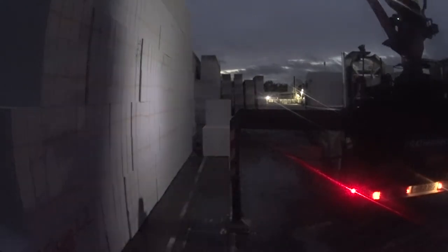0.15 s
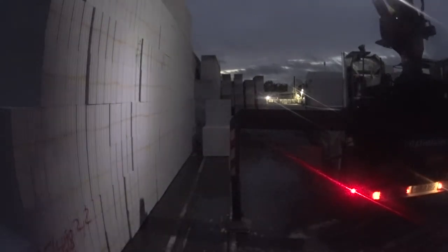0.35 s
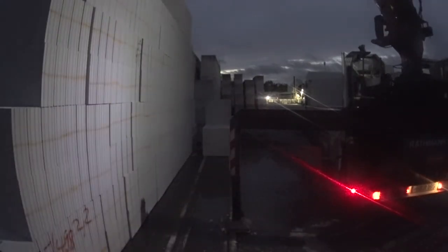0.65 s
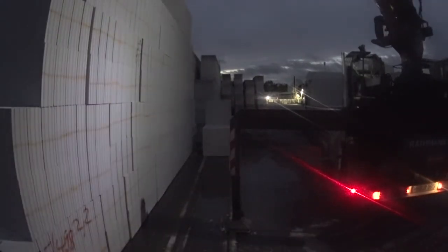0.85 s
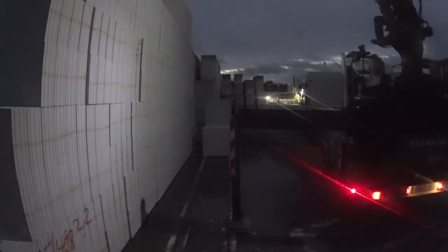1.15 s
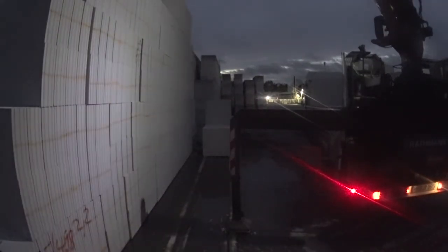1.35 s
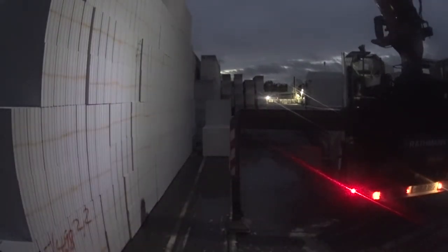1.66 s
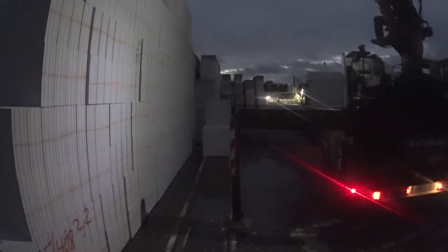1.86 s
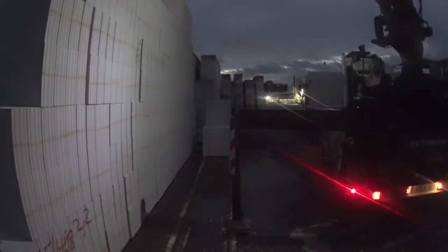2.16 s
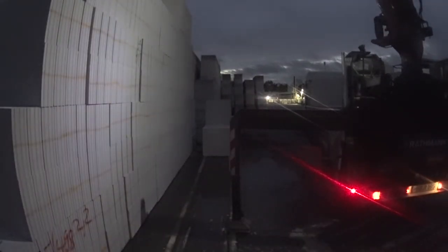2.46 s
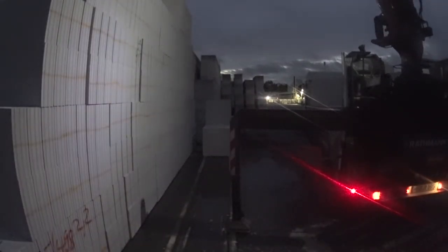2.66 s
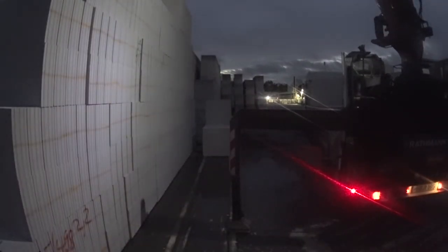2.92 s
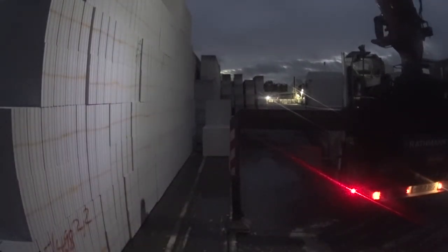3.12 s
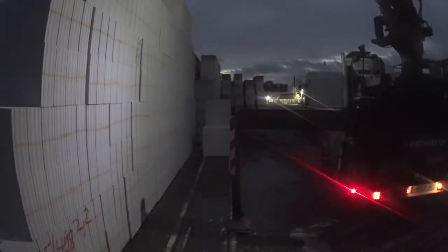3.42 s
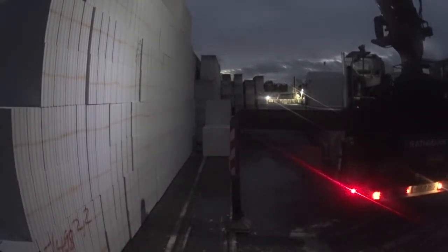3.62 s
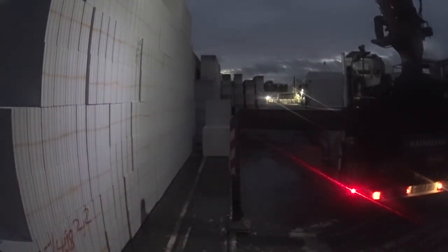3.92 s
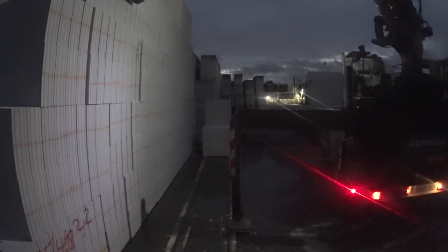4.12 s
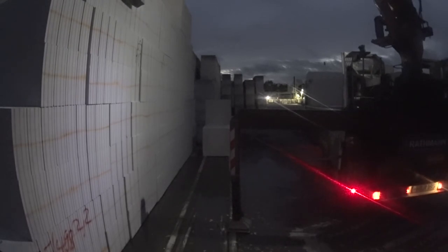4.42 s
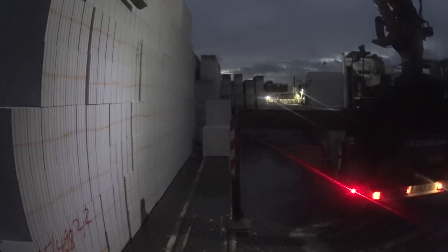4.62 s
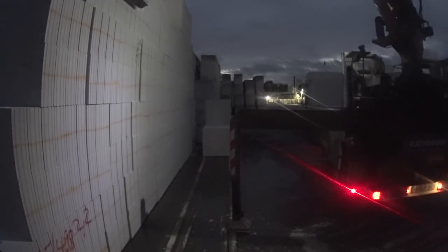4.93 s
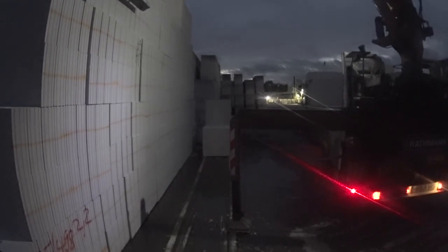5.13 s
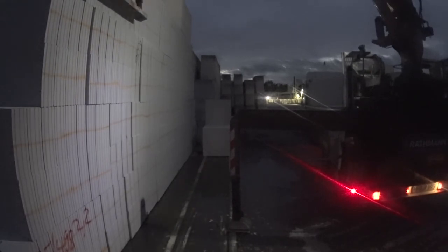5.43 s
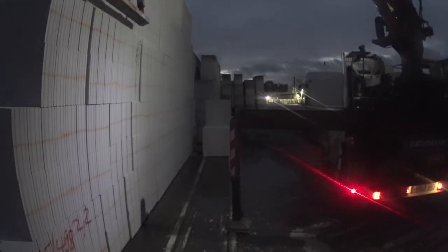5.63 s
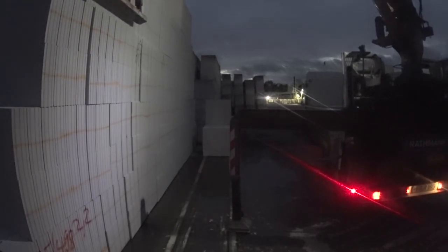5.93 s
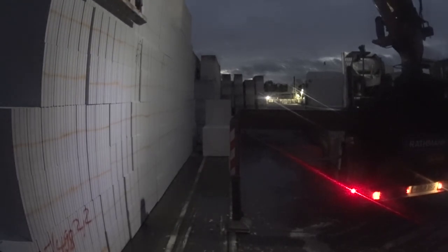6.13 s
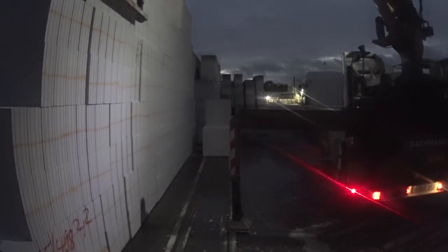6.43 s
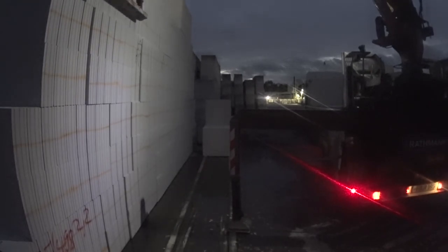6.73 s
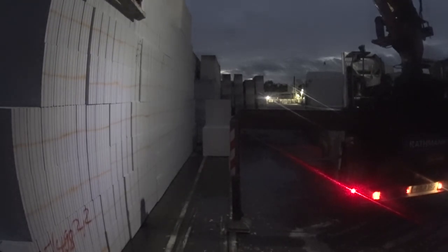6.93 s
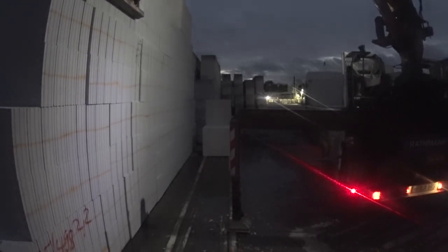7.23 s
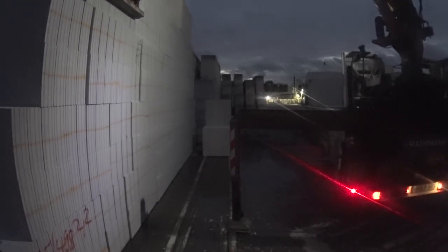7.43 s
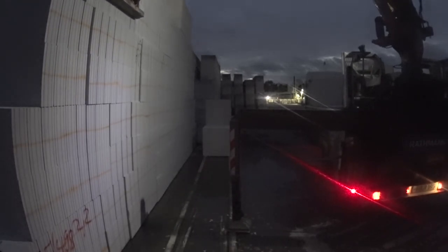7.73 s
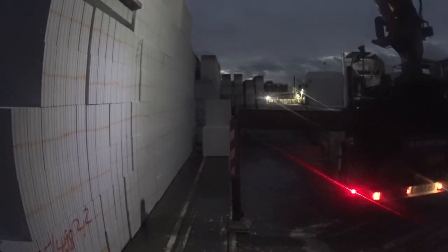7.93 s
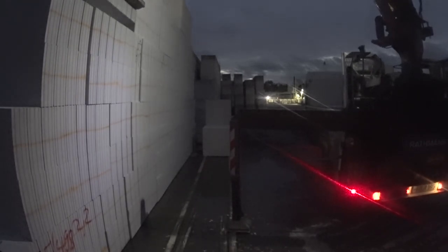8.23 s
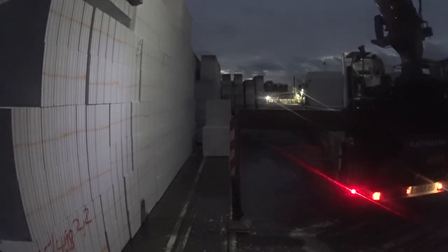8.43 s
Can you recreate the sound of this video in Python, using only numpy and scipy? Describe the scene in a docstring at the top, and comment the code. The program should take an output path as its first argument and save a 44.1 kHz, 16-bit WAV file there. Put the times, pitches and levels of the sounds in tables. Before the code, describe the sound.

Close stereo pickup beside a crane truck in an open yard. First a high valve whistle over the whining gear pump, then metallic ticks and a dry crackling rustle nearby. The whine keeps surging in short pulls, sometimes sagging roughly in pitch and springing back. Scattered clinks, soft scuffs and dull knocks follow, mostly quiet, with the strongest knock near the end.

```python
"""A loader crane's gear pump whines in a yard, as harmonics of the rate at which its teeth mesh.
Each load pulls the shaft to a new rate, mostly lower, and raises the whine; motor hum and
filtered-noise oil hiss follow it. Valves whistle at times as shaken tones, and brief tones rise.
Close by, noise bursts make small metal parts jingle and dull things knock, shuffle and rustle grittily."""
import sys
import numpy as np
from scipy import signal
from scipy.io import wavfile
from scipy.ndimage import uniform_filter1d

SR = 44100
rng = np.random.default_rng(int(sys.argv[2]) if len(sys.argv) > 2 else 0)


def wrap_up_sound(samples):
    """Save the sound to the file named by the first command line argument, as 16-bit audio."""
    columns = np.atleast_2d(samples).T
    # keep every value between -1 and 1, then stretch to whole-number steps
    tamed = np.clip(columns, -1, 1)
    steps = np.round(tamed * 32767).astype(np.int16)
    wavfile.write(sys.argv[1], SR, steps)


N = 377937
OPPOSED = np.array([[1], [-1]])   # side sound: opposite phase at the left and right microphone


def from_db(db):
    """Decibels to gain."""
    return 10 ** (np.asarray(db) / 20)


def rms_one(x):
    """Scale to rms 1."""
    return x / np.sqrt(np.mean(x ** 2) + 1e-20)


def in_time(rows):
    """Columns of a curve at every sample."""
    s, *columns = np.transpose(rows)
    return [np.interp(np.arange(N) / SR, s, column) for column in columns]


def sounding(rows):
    """1 within the span of a curve, with a short fade at each end."""
    start, end = rows[0][0], rows[-1][0]
    return np.interp(np.arange(N) / SR, [start - .02, start, end, end + .016], [0, 1, 1, 0])


def at_hz(points, hz):
    """Read a spectrum on a log frequency axis."""
    points_hz, level_db = np.array(points).T
    return np.interp(np.log(hz), np.log(points_hz), level_db)


def bandpass(x, order, low_hz, high_hz):
    """Keep one band of a sound."""
    return signal.sosfilt(signal.butter(order, [low_hz, high_hz], "band", fs=SR, output="sos"), x)


def panned(x, pan_db):
    """Lean towards the left microphone by a level step."""
    return x * from_db([[pan_db / 2], [-pan_db / 2]])


def drift(rate_hz):
    """Random wander of spread about 1: noise through two equal poles, drawn every 40 samples."""
    r = np.exp(-80 * np.pi * rate_hz / SR)
    noise = rng.standard_normal(N // 40 + 2002)
    slow = signal.lfilter([1], [1, -2 * r, r * r], noise)[2000:]   # skip the filter's start
    return np.interp(np.arange(N) / 40, np.arange(len(slow)), rms_one(slow))


def bank(sources, spectrum, width, patchy_db):
    """Half-octave bands of two mid-side noise pairs, each with its own level, flicker and width; rms 1."""
    out = 0
    edges_hz = 22 * 2 ** np.arange(0, 10, .5)
    together = drift(2.2)   # shared flicker, strongest in the bass
    for k, (low_hz, high_hz) in enumerate(zip(edges_hz, edges_hz[1:])):
        mid, side = bandpass(sources[k % 2], 2, low_hz, high_hz)
        hz = np.sqrt(low_hz * high_hz)
        flicker = drift(8.3) + 220 / (hz + 50) * together
        gain = from_db(at_hz(spectrum, hz) + patchy_db * flicker)
        out = out + gain * (mid + from_db(at_hz(width, hz)) * side * OPPOSED)
    return rms_one(out)


def tone(phase, multiple, level_db, waver_db, spread):
    """A partial whose level wavers and whose phase (spread in radians) differs between the microphones."""
    lag = spread * drift(4.2) * OPPOSED / 2
    start = rng.uniform(0, 2 * np.pi)
    return np.sqrt(2) * from_db(level_db + waver_db * drift(8.4)) * np.sin(multiple * phase + start + lag)


def burst(start_s, length_s, t60, low_hz, high_hz, grit_db):
    """Gritty noise that swells, holds, then dies; returns its start sample and a mid-side pair."""
    t = np.arange(int(.15 * SR)) / SR
    draw = rng.standard_normal((3, len(t)))
    shape = from_db(-60 * np.maximum(t - length_s, 0) / t60) * np.minimum(t / .0015, 1)
    grit = from_db(grit_db * rms_one(uniform_filter1d(draw[2], size=25)))
    return round(start_s * SR), bandpass(draw[:2] * shape * grit, 2, low_hz, high_hz)


def add(out, at, sound):
    """Mix a short sound in at a sample."""
    out[..., at:at + sound.shape[-1]] += sound[..., :out.shape[-1] - at]


# Partials of the motor hum. Each row: multiple of the hum rate, level in dB before the load acts.
HUM_PARTIALS = [(1, -61.5), (2, -71.5), (3, -77)]
HUM_PER_TOOTH = .3545   # hum rate over tooth rate


def motor_hum(phase, load_db):
    """Low partials locked to the shaft; load lifts the upper ones most."""
    return sum(tone(HUM_PER_TOOTH * phase, k, db + (0.12 + 0.22 * k) * load_db, waver_db=1.34, spread=0.032)
               for k, db in HUM_PARTIALS)


# Colour of the oil hiss. Each row: frequency in Hz, relative level in dB per Hz.
HISS_COLOUR = [(20, -25), (191, -25.5), (246, -14), (298, -20.5), (910, -14), (1380, -16), (1500, -6),
               (2770, -2), (6400, 0.5), (15600, -7)]
# Side level given to the hiss: nearly mono in the middle, wider on top.
# Each row: frequency in Hz, side against mid in dB.
HISS_SIDE = [(60, -20), (150, -17), (380, -31), (950, -28), (3000, -47), (4600, -10), (15000, -7)]
# Course of the oil flow. Each row: time in seconds, relative level of the hiss in dB.
OIL_FLOW = [(0.0, -35.5), (0.67, -37.5), (2.4, -38.5), (7.25, -39), (8.3, -38)]


def oil_hiss(load_db, labour):
    """Oil rushing through the valves as banded noise: louder under load, flickering fast in a slow pump."""
    noise = rng.standard_normal((2, 2, N)) * from_db(2.0 * labour * drift(270.0))
    level_db = in_time(OIL_FLOW)[0] + 1.5 + 0.22 * load_db + 2.0 * labour
    return from_db(level_db) * bank(noise, HISS_COLOUR, HISS_SIDE, patchy_db=1.38)


# Faint gritty shuffles close by. Each row: start in seconds, relative level in dB, length in seconds.
SHUFFLE_EVENTS = [(2.66, -51.5, 0.2), (3.173, -47, 0.58), (3.854, -49, 0.45), (5.297, -46.5, 0.52),
                  (6.351, -54, 0.24), (7.18, -42, 0.21), (7.948, -43.5, 0.75)]


def shuffles():
    """Dull grit under a smooth swell, wide between the microphones."""
    t = np.arange(N) / SR
    shape = sum(np.sin(np.pi * np.clip((t - s) / length_s, 0, 1)) * from_db(db)
                for s, db, length_s in SHUFFLE_EVENTS)
    noise = rng.standard_normal((2, N)) * shape * from_db(4.7 * drift(28.0))
    mid, side = bandpass(noise, 3, 700, 3200)
    return mid + 1.93 * side * OPPOSED


# Stroke of the rustle close by. Each row: time in seconds, relative level in dB.
RUSTLE_STROKE = [(1.62, -50.5), (1.72, -38), (1.9, -37.5), (2.08, -39.5), (2.12, -32), (2.27, -38),
                 (2.35, -34), (2.421, -38), (2.5, -32.5), (2.559, -48)]
# Crackling swells in the rustle. Each row: start in seconds, relative level in dB, length in seconds.
CRACKLES = [(1.806, -43, 0.00059), (1.853, -30, 0.00055), (2.116, -32, 0.023), (2.142, -24.5, 0.01),
            (2.153, -32.5, 0.029), (2.185, -25, 0.0053), (2.19, -28, 0.037), (2.233, -24, 0.016),
            (2.287, -22.5, 0.0061), (2.336, -28, 0.0076), (2.391, -33, 0.0009), (2.407, -50, 0.0005),
            (2.4355, -22, 0.0011), (2.458, -30.5, 0.01), (2.485, -24.5, 0.0016)]
# Colour of the rustle at the microphones. Each row: band centre in Hz, mid gain in dB, side gain in dB.
GRIT_BANDS = [(900, -7, -8), (1600, 5, 9), (2679, 10, 15), (4330, 2.5, 9.5)]


def rustle():
    """Dense short clicks in separately flickering bands, mostly in opposite phase at the microphones."""
    at = round(RUSTLE_STROKE[0][0] * SR)
    t = RUSTLE_STROKE[0][0] + np.arange(SR) / SR
    stroke = sounding(RUSTLE_STROKE) * from_db(in_time(RUSTLE_STROKE)[0] + 2.4 * drift(38.0))
    shape = stroke[at:at + SR]
    for s, level_db, length_s in CRACKLES:
        rise = np.clip((t - s) / (0.0003 + 0.38 * length_s), 0, 1)
        shape += rise * from_db(level_db - 60 * np.maximum(t - s - length_s, 0) / 0.037)
    # about 3500 clicks a second of uneven size, over a weaker steady noise
    strength = from_db(2.28 * np.minimum(rng.exponential(1, SR), 3.0))
    sizes = 0.15 + (rng.random(SR) < 3500 / SR) * strength
    clicks = rms_one(sizes) * rng.standard_normal((2, SR)) * shape
    for s, level_db, _ in CRACKLES:   # each swell opens with one sharp click
        clicks[:, round(s * SR) - at] += from_db(level_db + 9.0)
    out = np.zeros((2, N))
    for hz, mid_db, side_db in GRIT_BANDS:
        mid, side = bandpass(clicks, 2, hz / 1.416, hz * 1.383) * from_db(2.1 * drift(80.0)[:SR])
        out[:, at:at + SR] += from_db(mid_db) * mid + from_db(side_db) * side * OPPOSED
    return out


# Dull knocks close by. Each row: start in seconds, relative peak level in dB, centre in Hz.
KNOCK_EVENTS = [(1.528, -34.5, 1294), (2.801, -35, 1515), (3.257, -40, 1196), (3.331, -39, 1700),
                (4.103, -31, 1798), (5.503, -39, 1403), (5.518, -35, 1197), (5.533, -35, 1502),
                (6.914, -36.5, 1784), (8.275, -35, 1400), (8.295, -29.5, 1397), (8.318, -22, 2297),
                (8.325, -42, 2272)]


def knocks():
    """Short dull crunches of band-limited noise, wide between the microphones."""
    out = np.zeros((2, N))
    for s, peak_db, hz in KNOCK_EVENTS:
        at, (mid, side) = burst(s, 0.0037, 0.076, hz / 1.7, hz * 1.87, grit_db=3.0)
        add(out, at, (mid + 1.85 * side * OPPOSED) * from_db(peak_db + 1) / np.std(mid[:400]) / 2)
    return signal.sosfilt(signal.butter(2, 550, "high", fs=SR, output="sos"), out)


def ring(x, hz, t60):
    """One mode: a unit click sets a decaying sine ringing."""
    r, w = from_db(-60 / (t60 * SR)), 2 * np.pi * hz / SR
    return signal.lfilter([0, np.sin(w)], [1, -2 * r * np.cos(w), r * r], x)


# Jingles of small metal parts close by. Each row: start in seconds, relative peak level in dB,
# length in seconds before the contacts die away.
JINGLES = [(1.117, -9, 0.018), (1.1455, -17, 0.0021), (1.152, -16, 0.0038), (1.203, -12, 0.0018),
           (1.244, -22, .003), (1.5366, -10, 0.024), (1.584, -19.5, 0.006), (1.771, -14, 0.0028),
           (1.8305, -20, 0.0021), (2.099, -23, 0.0035), (2.248, -15, 0.0026), (2.288, -15.5, 0.0022),
           (2.9483, -12.5, 0.0036), (4.0932, -12, 0.0083), (4.12, -17, 0.0021), (4.162, -20.5, 0.00096),
           (4.235, -18.5, 0.0066), (4.7712, -9.5, 0.0073), (5.227, -22.5, 0.003), (6.371, -25.5, 0.0029),
           (6.397, -23.5, 0.0029), (6.453, -15, 0.0088), (7.1747, -19.5, 0.0025), (7.204, -18, 0.0029),
           (7.2122, -15, 0.006), (7.2215, -12.5, 0.003)]
# Modes of the small metal parts. Each row: frequency in Hz, relative level in dB, 60 dB decay in seconds.
METAL_MODES = [(2900, -18, .012), (4170, -19, .007), (7600, -2, .025), (8800, 4, .012), (10090, 6, .06),
               (12800, 8, .018), (15110, 8, .045)]
RING_DB = -41   # the modes against the direct spray, before long sprays lower it


def metal_jingle():
    """Tiny contacts to the left, heard directly and through metal modes whose balance varies each time."""
    out = np.zeros((2, N))
    for s, peak_db, length_s in JINGLES:
        at, (spray, side) = burst(s, length_s, 0.037, 4970, .45 * SR, grit_db=4.0)
        luck_db = rng.normal(0, 4, len(METAL_MODES))
        ringing = sum(from_db(db + luck) * ring(spray, hz, t60)
                      for (hz, db, t60), luck in zip(METAL_MODES, luck_db))
        mid = spray + from_db(RING_DB) / np.sqrt(1 + length_s / 0.044) * ringing
        gain = from_db(peak_db - 3.0) / np.std(mid[:250 + int(length_s * SR)]) / 2
        add(out, at, (mid + 0.28 * side * OPPOSED) * gain)
    return panned(out, 3.1)


# Brief rising tones, some of them upper pump harmonics standing out.
# Each row: start in seconds, mean pitch in Hz, relative level in dB, length in seconds.
RISING_TONES = [(0.638, 3600, -37, 0.037), (3.652, 4824, -34.5, 0.012), (5.412, 3080, -38, 0.009),
                (7.394, 4960, -35.5, 0.019)]


def rising_tones():
    """Brief tones under a smooth swell, their pitch rising a little."""
    out = np.zeros(N)
    for s, hz, level_db, length_s in RISING_TONES:
        t = np.arange(int(length_s * SR)) / SR
        swell = from_db(level_db + 5.5) * np.sin(np.pi * t / length_s)
        cycles = hz * t * (1 + 0.028 * (t / length_s - 1))
        add(out, round(s * SR), swell * np.sin(2 * np.pi * cycles))
    return out


def whistle(rows, width_hz):
    """A tone whose pitch is shaken by the turbulent jet."""
    hz, level_db = in_time(rows)
    phase = 2 * np.pi * np.cumsum(hz + width_hz * drift(163.0)) / SR
    return sounding(rows) * tone(phase, 1, level_db - 6.5, waver_db=3.0, spread=0.41)


# High valve whistles, one curve each. Each row: time in seconds, mean pitch in Hz, relative level in dB.
HIGH_WHISTLES = [
    [(0.0, 10800, -39.5), (0.394, 10580, -32), (0.48, 10800, -51)],
    [(7.38, 10490, -46), (7.532, 10350, -35), (7.56, 10240, -64)],
]
# A lower valve whistle. Each row: time in seconds, mean pitch in Hz, relative level in dB.
LOWER_WHISTLE = [(0.17, 5250, -41), (0.25, 5400, -26.5), (0.44, 5400, -40)]
# Upper strand into which the lower one splits. Each row: time in seconds, mean pitch in Hz,
# relative level in dB.
SPLIT_WHISTLE = [(0.27, 5580, -38), (0.34, 5660, -29), (0.41, 5560, -38)]


def valve_whistles():
    """Oil jets whistle in the valves: high tones, and a lower one that splits in two."""
    high = sum(whistle(rows, width_hz=120) for rows in HIGH_WHISTLES)
    return high + whistle(LOWER_WHISTLE, width_hz=37) + whistle(SPLIT_WHISTLE, width_hz=58)


# Loads on the pump. Each row: onset in seconds, time to the new rate in seconds, hold in seconds,
# tooth rate reached first in Hz, rate at release in Hz, rate just after release in Hz, then in dB the
# relative levels that whine and third harmonic grow towards and the lift of the fifth harmonic.
PUMP_LOADS = [(-0.3, 0.23, 0.68, 693, 704.5, 740, -36.5, -39, 0),
              (0.55, 0.053, 0.056, 709, 714, 764, -33.5, -37.5, 0.5),
              (0.715, 0.054, 0.14, 700, 701, 706, -42, -43.5, 2.5),
              (0.917, 0.084, 0.15, 694, 704, 720, -36.5, -44.5, 4),
              (1.177, 0.26, 0.0849, 701.6, 701, 740, -38.5, -44.5, 5),
              (1.859, 0.06, 0.44, 691.7, 704, 723, -40, -46, 0),
              (2.68, 0.066, 0.45, 697, 706, 710, -43.5, -49, 7.5),
              (3.311, 0.053, 0.22, 689, 702.6, 717, -38.5, -44, 4),
              (3.625, 0.048, 0.056, 638, 651, 753, -34, -36.5, 0),
              (3.886, 0.035, .21, 691, 703, 722, -38.5, -45, 1.5),
              (4.257, 0.068, 0.18, 678.6, 690, 710, -38.5, -43, 2.5),
              (4.483, 0.047, 0.021, 711.4, 722, 727, -32.5, -40, 9),
              (4.549, 0.062, 0.0087, 669, 669, 765, -31.5, -40, -2.5),
              (4.722, 0.036, 0.02, 687, 695, 718, -36.5, -44, 3),
              (5.022, 0.046, 0.087, 687.4, 698.6, 709, -41, -43.5, 1.5),
              (5.291, 0.047, 0.15, 687, 698.3, 726, -40.5, -45.5, 2.5),
              (5.612, 0.044, 0.16, 686.7, 701, 718.6, -39, -45, 4),
              (5.975, 0.0554, 0.047, 687, 687, 695, -40, -44.5, 3),
              (6.07, 0.076, 0.056, 675, 684, 743, -36.5, -44, 3),
              (6.311, 0.062, 0.1, 693.4, 700.8, 721, -38, -46.5, 5),
              (6.62, 0.063, 0.19, 687.4, 683, 729, -40, -46, 1),
              (7.128, 0.064, 0.081, 638.5, 665.4, 764, -34.5, -39, 2),
              (7.366, 0.061, .13, 654.3, 696, 779, -32, -41, 1),
              (7.676, 0.23, 0.017, 676, 689, 695, -37, -46.5, 1.5),
              (7.904, 0.086, 0.37, 699.4, 705.4, 713, -35.5, -36.5, -1.5),
              (8.376, 0.047, 0.28, 714, 710, 718, -37.5, -43.5, 1)]
IDLE_HZ, IDLE_WHINE_DB, IDLE_THIRD_DB = 707.7, -53, -53.5   # tooth rate and relative levels without load
RECOVER_S, SETTLE_S = 0.15, 0.07   # the rate moves on under load; settles to idle after the release
RELEASE_S, FADE_S = 0.0311, 0.032   # the load lets go; the whine dies away after it
SWELL_DB, SWELL_S = 4.5, 0.13   # the whine still grows while the load is on
PULL_CURVE, GRIP_S = 0.7, 0.038   # under 1 the pull is fastest at first; time for the whine to come up


def shaft():
    """Each load pulls the shaft to a new rate, mostly lower; release shifts it again, then it settles to idle.

    Returns tooth rate, whine level, third harmonic level and fifth harmonic lift."""
    idle = np.array([[IDLE_HZ], [IDLE_WHINE_DB], [IDLE_THIRD_DB], [0]], float)
    state = idle * np.ones(N)
    for on, pull_s, hold_s, first_hz, end_hz, after_hz, whine_db, third_db, fifth_db in PUMP_LOADS:
        i = max(round(on * SR), 0)
        t = np.maximum(np.arange(i, min(i + SR, N)) / SR - on, 0)
        moved = 1 - np.exp(-np.clip(t - pull_s, 0, hold_s) / RECOVER_S)
        moved /= 1 - np.exp(-hold_s / RECOVER_S)
        short_db = SWELL_DB * np.exp(-t / SWELL_S)
        held_hz = first_hz + (end_hz - first_hz) * moved
        held = np.array([held_hz, whine_db - short_db, third_db - short_db, fifth_db + 0 * t])
        after = t - pull_s - hold_s
        free = idle * np.ones(len(t))
        free[0] += (after_hz - IDLE_HZ) * np.exp(-np.maximum(after - RELEASE_S, 0) / SETTLE_S)
        grip = np.minimum(t / GRIP_S, 1)
        taken = np.array([np.minimum(t / pull_s, 1) ** PULL_CURVE, grip, grip, grip])
        fade = 1 - np.exp(-np.maximum(after, 0) / FADE_S)
        gone = np.array([np.clip(after / RELEASE_S, 0, 1), fade, fade, fade])
        loaded = taken * held + (1 - taken) * state[:, i:i + SR]
        state[:, i:i + SR] = (1 - gone) * loaded + gone * free
    return state


# Resonances of the pump casing. Each row: frequency in Hz, half-width in Hz, lift in dB (negative swallows).
CASING_MODES = [(2316.5, 27, 13), (2735, 7.7, -8.5), (2856, 16, 4), (3405, 32, -9), (3462, 32, 9.5),
                (3520, 26, -14), (4157, 117, 8.5), (4834, 35, 12)]


def casing(partial_hz):
    """Lift in dB that the casing gives a harmonic as it passes."""
    return sum(db / (1 + ((partial_hz - hz) / width) ** 2) for hz, width, db in CASING_MODES)


# Tooth harmonics but the third. Each row: multiple of the tooth rate, relative level in dB against the whine,
# share of the load swings, share of the third harmonic's lead.
TOOTH_HARMONICS = [(1, -31, 0.69, 0.16), (2, -8.5, 0.87, -0.1), (4, -2, 0.19, -0.94), (5, -5, 0.75, 0.5),
                   (6, -12, 0.65, -0.16), (7, -18, 1.12, 0.31)]


def gear_whine(phase, tooth_hz, levels_db, rough, racing):
    """Meshing teeth sound in harmonics that the casing colours; they throb at the hum rate."""
    whine_db, third_db, fifth_db = levels_db
    mean_db = np.mean(whine_db)
    lead_db = third_db - whine_db + 6.5   # how far the third harmonic stands out
    third_db = third_db + casing(3 * tooth_hz) - 5.4 * rough * np.abs(drift(60.0))
    whine = tone(phase, 3, third_db, waver_db=2.5, spread=0.011)
    for k, db, share, follow in TOOTH_HARMONICS:
        level_db = mean_db + db + share * (whine_db - mean_db) + follow * lead_db + casing(k * tooth_hz)
        if k == 5:
            level_db = level_db + fifth_db
        broken_db = rough * (4.0 - 8.5 * np.abs(drift(55.0)))
        whine += tone(phase, k, level_db + broken_db, waver_db=2.5, spread=0.069)
    throb = 1 + (0.11 + 0.37 * rough) * np.sin(HUM_PER_TOOTH * phase)
    return from_db(-12 * racing) * throb * whine


LABOURS_BELOW_HZ = 680   # tooth rate under which the pump runs rough


def pump():
    """Tooth harmonics, motor hum and oil hiss follow one shaft and one load."""
    tooth_hz, *levels_db = shaft()
    load_db = levels_db[0] - np.mean(levels_db[0])
    labour = np.clip((LABOURS_BELOW_HZ - tooth_hz) / 25, 0, 1)
    slope = uniform_filter1d(np.gradient(tooth_hz) * SR, size=400)   # Hz per s
    rough = np.maximum(labour, np.clip(-slope / 900, 0, 1))   # a sudden slowing breaks the tones up too
    racing = np.clip(slope / 1500, 0, 1)   # while the rate climbs fast the teeth fall quiet
    jitter = 0.00097 * drift(20.7) + 0.00694 * rough * drift(55.1)
    phase = 2 * np.pi * np.cumsum(tooth_hz * (1 + jitter)) / SR
    whine = gear_whine(phase, tooth_hz, levels_db, rough, racing)
    return motor_hum(phase, load_db) + oil_hiss(load_db, labour) + whine


def scene():
    """Everything heard in the yard."""
    close_by = shuffles() + rustle() + knocks() + metal_jingle()
    return close_by + rising_tones() + valve_whistles() + pump()


def record(dry):
    """The highest peaks are rounded; the top is cut in two steps."""
    first = signal.ellip(8, .5, 30, 15720, fs=SR, output="sos")   # cutoff in Hz
    second = signal.cheby2(16, 40, 17100, fs=SR, output="sos")   # 40 dB down from this Hz upwards
    return signal.sosfilt(np.vstack([first, second]), np.tanh(dry))


dry = scene()
out = record(dry)
wrap_up_sound(out)
```